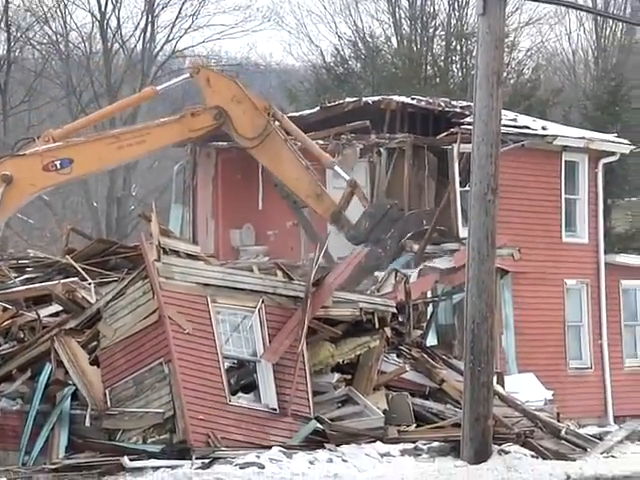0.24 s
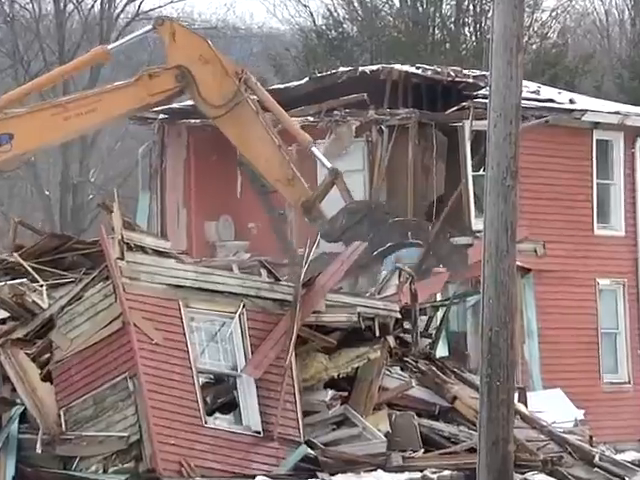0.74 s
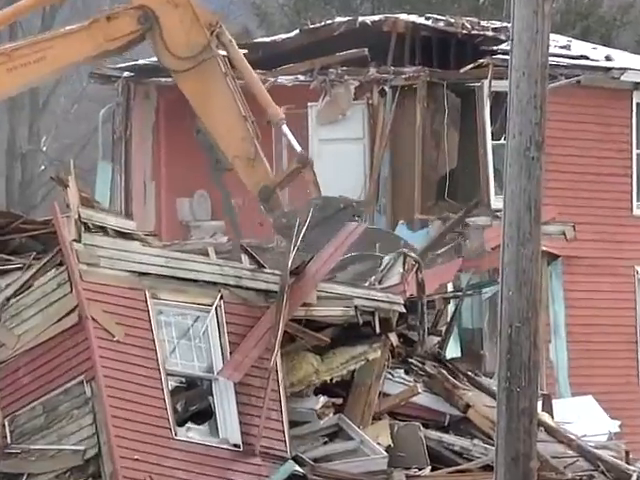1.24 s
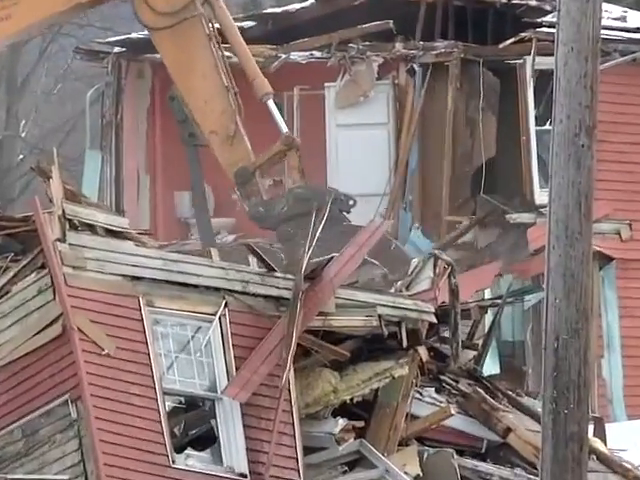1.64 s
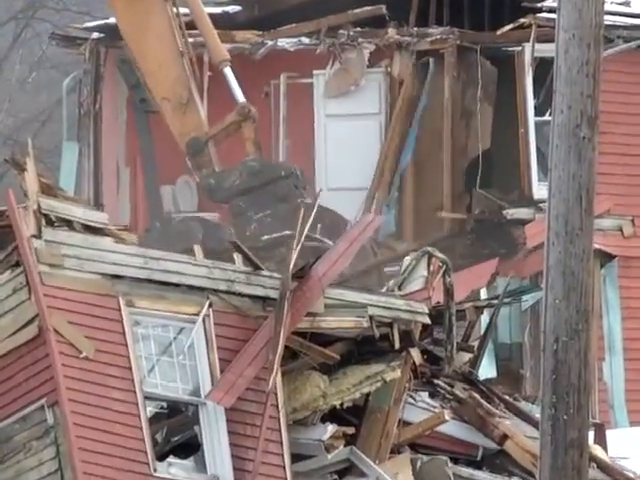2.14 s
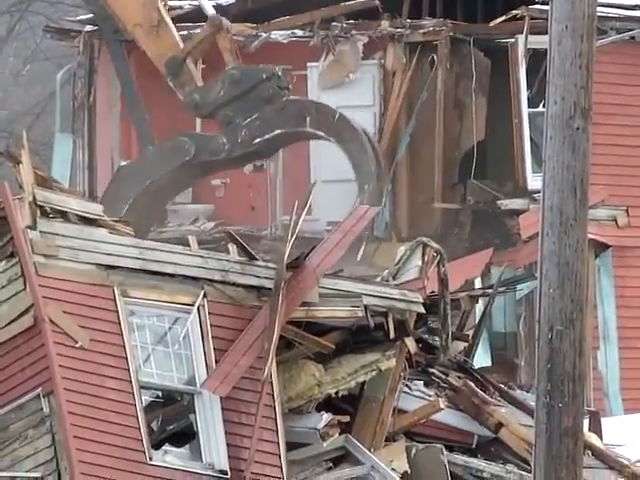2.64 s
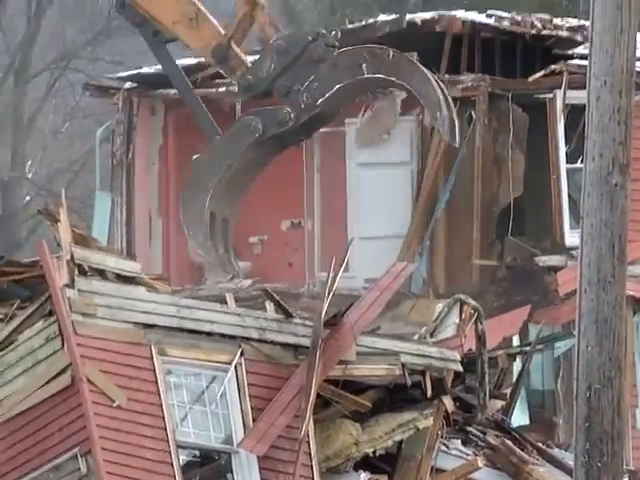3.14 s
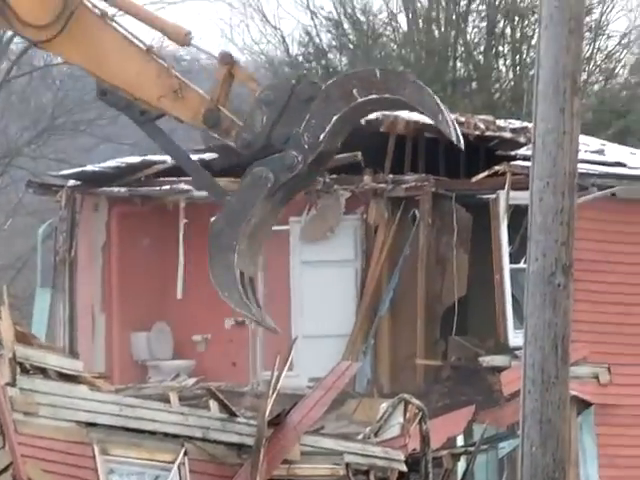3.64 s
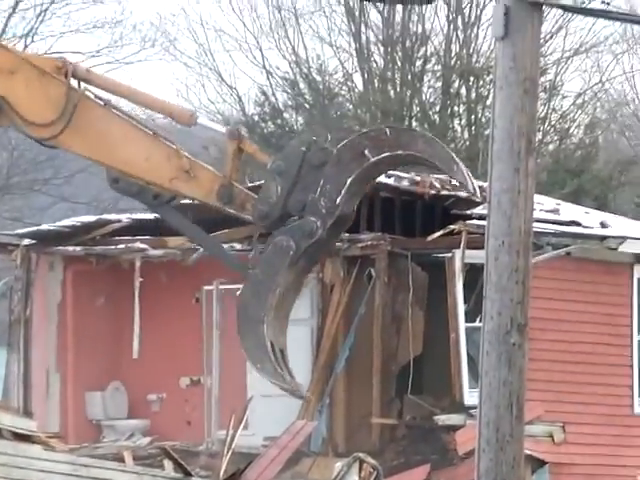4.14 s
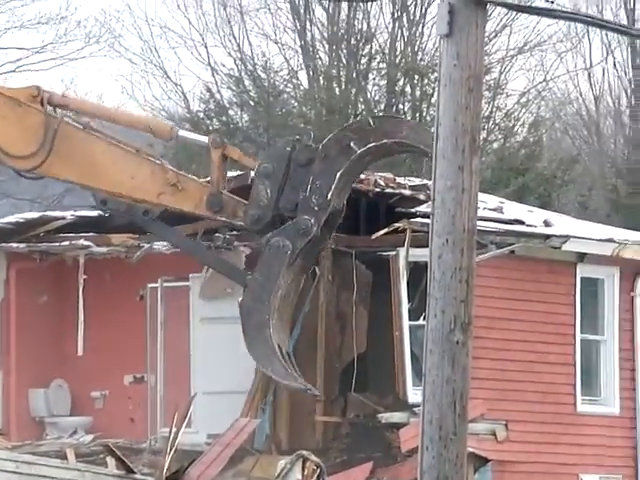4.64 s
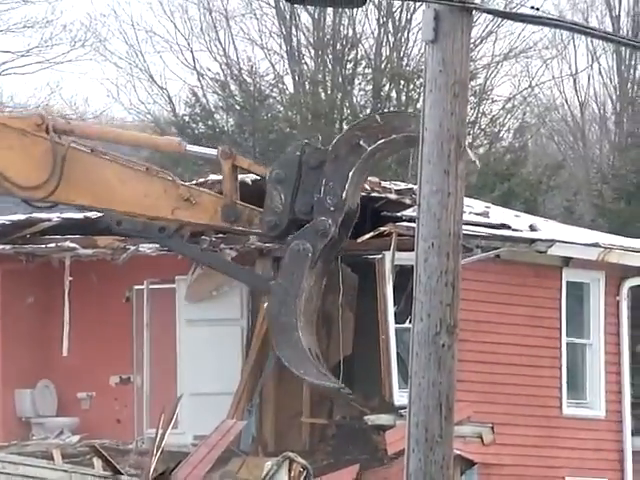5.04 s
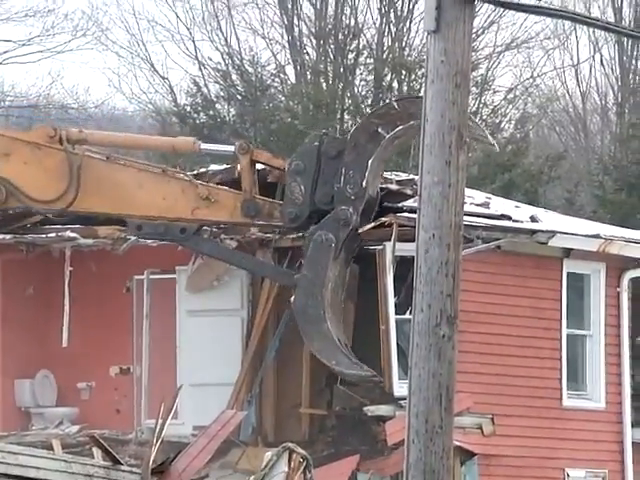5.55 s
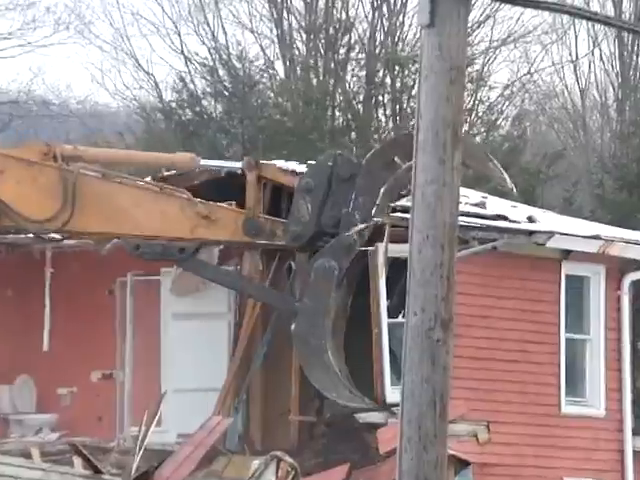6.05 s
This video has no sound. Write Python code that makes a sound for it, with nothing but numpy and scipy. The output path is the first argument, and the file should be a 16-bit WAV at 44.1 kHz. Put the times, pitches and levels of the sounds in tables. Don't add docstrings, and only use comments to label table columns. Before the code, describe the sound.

Loud engine roar beside a wooden house being torn down: early splintering crack and clattering boards, a sharp snap, then pump whine and howling oil pressure.

```python
import sys
import numpy as np
from scipy import signal
from scipy.fft import rfft, irfft, next_fast_len
from scipy.io import wavfile
from scipy.ndimage import uniform_filter1d

SR = 44100
rng = np.random.default_rng(int(sys.argv[2]) if len(sys.argv) > 2 else 0)


def wrap_up_sound(samples):
    columns = np.atleast_2d(samples).T
    tamed = np.clip(columns, -1, 1)
    steps = np.round(tamed * 32767).astype(np.int16)
    wavfile.write(sys.argv[1], SR, steps)


def decibels_to_gain(level_db):
    exponent = np.asarray(level_db, float) / 20
    return 10 ** exponent


N = 278112
STEP = 64
SIZE = next_fast_len(N + 8192)
HZ = np.maximum(np.arange(SIZE // 2 + 1) * SR / SIZE, 1)
TIME = np.arange(N) / SR
COARSE = np.arange(N // STEP + 2) * STEP / SR
FIRING_HZ = 100.4
LIFT_S = 1.95


def in_time(rows, t):
    s, *columns = np.transpose(rows)
    return [np.interp(t, s, c) for c in columns]


def at_hz(points, hz, count=1):
    return np.interp(np.log(hz), np.log(np.array(points)[:, 0]), np.array(points)[:, count])


def drift(rate_hz):
    r = np.exp(-2 * np.pi * rate_hz * STEP / SR)
    slow = signal.lfilter([1], [1, -2 * r, r * r], rng.standard_normal(len(COARSE) + 1000))[1000:]
    return slow / np.std(slow)


def fine(coarse):
    return np.interp(TIME, COARSE, coarse)


def oscillator_phase(hz):
    return 2 * np.pi * np.cumsum(hz) / SR


def since(s, t60):
    start = int(s * SR) + 1
    t = TIME[start:start + int(t60 * SR)] - s
    return slice(start, start + len(t)), t


def ring(s, hz, t60):
    out = np.zeros(N)
    span, t = since(s, t60)
    out[span] = np.sin(2 * np.pi * hz * t) * decibels_to_gain(-60 * t / t60) * (1 - np.exp(-1.5 * hz * t))
    return out


def before_lift():
    return np.clip((LIFT_S - TIME) * 10, 0, 1)


def during(spans, values=1):
    fade_s = 0.065
    inside = [np.clip(np.minimum(TIME - start, end - TIME) / fade_s, 0, 1) for start, end, *_ in spans]
    return (np.c_[values] * inside).sum(axis=0)


# (frequency [Hz], share [0-1], phase lead [rad])
PORT_COUPLING = [(25, .5, -0.5), (500, 0.03, 2), (1000, 0.53, 1.5), (1800, 0.28, -1), (2500, 0.7, -2.5),
                 (3200, 0.7, -5), (4070, 0.57, -6), (5330, 0.7, -7), (7050, 0.2, -20.5),
                 (15700, 0.5, -42.5)]


def port_noise():
    ahead, own = rfft(rng.standard_normal((2, SIZE))) * np.sqrt(SR / 2)
    share = np.clip(at_hz(PORT_COUPLING, HZ), 0, .95)
    copied = share * ahead * np.exp(1j * at_hz(PORT_COUPLING, HZ, count=2))
    return ahead, copied + np.sqrt(1 - share ** 2) * own


# (frequency [Hz], density [dB per Hz])
AHEAD_SPECTRUM = [(25, -57), (42, -57), (62, -53.5), (130, -54.5), (280, -57), (520, -55), (950, -53),
                  (1550, -53.5), (2200, -62.5), (3300, -73.5), (5300, -89.5), (6700, -99), (10500, -94),
                  (15500, -99)]
# (frequency [Hz], density [dB per Hz])
ACROSS_SPECTRUM = [(25, -86), (250, -72), (600, -63.5), (900, -53.5), (1500, -48), (2200, -55), (3200, -65),
                   (4200, -73.5), (5400, -80.5), (7300, -94), (9300, -90.5), (10600, -86), (12000, -91),
                   (15500, -97)]
# (time [s], engine effort [dB], rubble and iron on the move [dB],
# engine side turned across the ports [dB], bearing to the left [dB])
WORK_CYCLE = [(0, 0.5, 1.5, 2.5, -4), (.2, -3.5, 2.5, -0.5, -0.5), (.45, -1, 8, -3.5, 2.5),
              (.7, -1.5, 3.5, -1.5, 0), (1.05, -1.5, 6, 0, -1.8), (1.3, -1.5, 1, 3.5, -0.5),
              (1.75, -3, -3.5, -3, 1.5), (2.2, -1.5, -2, -0.8, 1.3), (2.7, 0.5, -3.5, -2, 2.5),
              (3.2, 0.5, -2, -3.5, 1.5), (3.65, 2.4, -0.6, -3, 0), (4.05, 4, -1, 0.3, -1.5),
              (4.45, -0.8, 4, 3.5, -1.5), (4.75, -1, 2, 3, -0.2), (5.02, 0.5, -2.3, -2, 1.7),
              (5.4, 2, 0.8, 6, -1), (5.7, 2.4, 0.6, 5.5, -2), (6.31, 4, 0.1, -2, -2.9)]
# (dB per dB of effort, of rubble, of turn, of bearing)
RUMBLE, DRONE, ROAR, RASP = (0.26, 0.37, 0.4, 0.5), (0.28, 0.81, -0.21, -0.35), (1, 0, 0, 0), (1, 0.61, -0.19, -0.5)
CLATTER, HISS, AIR = (0, 1, 0, 0), (-.3, -0.06, 0.4, -0.64), (0.12, .35, 0.046, -.35)
ROAR_ACROSS, RASP_ACROSS = (0, 0, 1, 0), (-0.3, 0.49, -0.22, -.55)
CLATTER_ACROSS = (0.24, 0.39, -0.59, -2.1)


def machine(shared_db, own_db, knock):
    hiss_flicker_db = 1.3
    work = np.array(in_time(WORK_CYCLE, COARSE))
    bearing_db = work[-1]
    parts_hz = np.log([90, 400, 1400, 2250, 3800, 7000, 15000])
    parts = np.array([[RUMBLE, DRONE, ROAR, RASP, CLATTER, HISS, AIR],
                      [RUMBLE, DRONE, ROAR_ACROSS, RASP_ACROSS, CLATTER_ACROSS, HISS, AIR]]) @ work
    parts = parts - parts.mean(axis=2, keepdims=True)
    white = port_noise()
    colours = decibels_to_gain(at_hz(AHEAD_SPECTRUM, HZ)), decibels_to_gain(at_hz(ACROSS_SPECTRUM, HZ))
    firing = np.cos(oscillator_phase(FIRING_HZ + fine(3.33 * drift(5.6))))
    out, together, octave = np.zeros((2, N)), drift(16.3), np.log2(HZ)
    for centre in np.arange(13, 43) / 3:
        mask = np.clip(1 - 3 * abs(octave - centre), 0, 1)
        place = np.interp(centre * np.log(2), parts_hz, np.arange(7))
        low = min(int(place), 5)
        swing_db = parts[:, low] * (low + 1 - place) + parts[:, low + 1] * (place - low)
        shared_flicker_db = shared_db * together * (.5 < place < 4.3)
        own_flicker_db = drift(28) * (own_db if place < 4.3 else hiss_flicker_db)
        gains = decibels_to_gain(swing_db + shared_flicker_db + own_flicker_db)
        ahead, across = (irfft(white[k] * colours[k] * mask, SIZE)[:N] for k in range(2))
        if 900 < 2 ** centre < 2100:
            share = fine(np.clip(0.13 * bearing_db, -.9, .9))
            leaked = irfft(white[0] * colours[1] * mask, SIZE)[:N]
            across = share * leaked + np.sqrt(1 - share ** 2) * across
        pulse = 1 + knock * firing * (place > 1)
        for k, band in enumerate((ahead, across)):
            out[k] += band * pulse * fine(gains[k])
    return out


# (start [s], end [s], strength [dB], sag [Hz], negative rises)
RAM_STROKES = [(1.95, 2.35, -2, 0), (2.404, 2.92, 1, -3), (2.97, 3.352, 1.5, 12.5), (3.402, 3.65, 0, -8),
               (3.901, 4.2, 0.5, 11), (4.199, 4.498, 3.5, -10.5), (4.75, 5.8, -2, 0),
               (5.802, 6.399, -0.5, 11)]
# (start [s], end [s])
LOAD_HOLDS = [
    (1.05, 1.56),
    (4.2, 5.55),
]


def pump_whine(pitch_wobble, half_wobble):
    strength_db, sag_hz = np.transpose(RAM_STROKES)[-2:]
    whine_db = -34 - 9 * (1 - during(RAM_STROKES)) + during(RAM_STROKES, strength_db) - 6 * before_lift()
    half_db = -40.5 - 9.5 * (1 - during(LOAD_HOLDS))
    turn = oscillator_phase(598 - during(RAM_STROKES, sag_hz) + 3.0 * pitch_wobble)
    whine = decibels_to_gain(whine_db + 1.5 * fine(drift(6.3))) * np.sin(turn)
    half = decibels_to_gain(half_db + 1.5 * half_wobble) * np.sin(turn / 2)
    return whine + half


def firing_hum(pitch_wobble, level_wobble):
    return decibels_to_gain(-42 + 0.83 * level_wobble) * np.sin(oscillator_phase(FIRING_HZ + 1.4 * pitch_wobble))


def throb(pitch_wobble, level_wobble):
    return decibels_to_gain(-43 + 3.0 * level_wobble) * np.sin(oscillator_phase(26.6 + 0.73 * pitch_wobble))


def tones():
    engine, half, load, shake = [fine(drift(4.72)) for k in range(4)]
    total = pump_whine(engine, half) + firing_hum(engine, load) + throb(load, shake)
    return np.sqrt(2) * total * decibels_to_gain([[0], [-17]])


# (time [s], centre [Hz], level [dB])
VALVE_HOWL = [(1.9, 950, -36), (2.6, 940, -29.5), (3.3, 940, -25), (4.0, 915, -26), (4.6, 930, -25.5),
              (5.0, 950, -29), (5.5, 1010, -22.5), (5.95, 990, -36), (6.31, 1000, -25)]


def howl(width_hz):
    hz, db = in_time(VALVE_HOWL, TIME)
    db = db + fine(drift(9.0)) - 12 * before_lift()
    turn = oscillator_phase(hz + 25 * fine(drift(8.0)))
    cos_part, sin_part = fine(drift(width_hz)), fine(drift(width_hz))
    return decibels_to_gain(db) * (cos_part * np.cos(turn) + sin_part * np.sin(turn)) * decibels_to_gain([[0], [-7]])


# (time [s], peak [dB], ring [Hz], t60 [s], difference
# re head-on [dB])
WOOD_BLOWS = [
    (.3152, -3, 1450, .016, -12),
    (.321, -13, 1500, .05, -12),
    (.3265, -10, 1900, .025, -4),
    (.3303, -3, 700, .018, -14),
    (.339, -5, 560, .06, -14),
    (.3575, -10, 1200, .05, -10),
    (.3662, -6, 680, .018, -10),
    (.862, -18, 70, .2, -25),
    (.908, -13, 95, .3, -25),
              (0.579, -19, 1600, 0.049, 6), (0.341, -17.5, 175.5, 0.18, -37), (.405, -14, 495, 0.14, -20),
               (0.4272, -13, 1080, 0.044, -10), (.525, -17, 695, 0.042, 2), (.584, -21, 484, 0.19, -15),
               (.62, -18.5, 172, 0.15, -27), (0.636, -14.5, 417, 0.081, -15), (0.657, -9.5, 1654, .03, -8),
               (0.729, -18, 1000, .05, -8), (.835, -14, 453, 0.064, -23), (0.991, -16, 123, 0.089, -26),
               (1.095, -22, 98.3, 0.13, -27), (1.138, -15.5, 1473, 0.12, -10), (4.43, -14, 620, .08, -12),
               (4.601, -18, 184, 0.17, -16), (5.359, -6, 1000, 0.024, -11)]


def knocks():
    blows = WOOD_BLOWS
    out, detune = np.zeros((2, N)), rng.uniform(1.08, 1.4, len(blows))
    for (s, db, hz, t60, across_db), ratio in zip(blows, detune):
        main = ring(s, hz, t60)
        neighbour = ring(s + 0.00166, hz * ratio, 1.9 * t60)
        out[0] += decibels_to_gain(db) * (main + 0.21 * neighbour)
        out[1] += decibels_to_gain(db + across_db) * (neighbour * 0.57 - ring(s + 0.00047, hz, t60))
    return out


# (frequency [Hz], head-on level [dB], difference level [dB])
LATH_MODES = [
    (2300, -17, -9),
    (2620, -19, -12),
]


def snap():
    start_s, length_s = 1.6332, .0056
    tear_hz, tear_db = [6500, 15700], [[-37], [-28]]
    phase = np.clip((TIME - start_s) / length_s, 0, 1)
    swell = np.sin(np.pi * phase ** 1.3) ** 2
    t = TIME - start_s - .6 * length_s
    lath = sum(np.cos(2 * np.pi * hz * t) * decibels_to_gain([[ahead_db], [across_db]]) * [[-1], [1]]
               for hz, ahead_db, across_db in LATH_MODES)
    bright = signal.butter(3, tear_hz, "band", fs=SR, output="sos")
    tear = signal.sosfilt(bright, rng.standard_normal((2, N)))
    return swell * (lath + decibels_to_gain(tear_db) * tear)


# (time [s], t60 [s], board band [dB], clatter band [dB], top band [dB])
SPLINTER_BURSTS = [(.315, .06, -18, -28, -44), (.3255, .1, -13, -23, -38), (.327, .025, -30, -24, -27),
                   (.342, .3, -19, -35, -56), (1.6342, .015, -36, -19, -21), (.366, .03, -30, -36, -52),
                   (.42, .15, -24, -36, -52), (.49, .1, -26, -36, -49), (.68, .06, -28, -36, -48),
                   (.815, .08, -28, -36, -47), (.92, .1, -28, -33, -46), (1.04, .08, -28, -36, -48),
                   (1.545, .08, -36, -48, -50), (.53, .06, -22, -36, -52), (.58, .07, -22, -36, -50),
                   (.655, .06, -22, -35, -52), (.73, .05, -24, -38, -52), (1.135, .08, -22, -36, -52),
                   (1.99, .06, -36, -42, -52), (2.665, .1, -36, -44, -47)]
# (low edge [Hz], high edge [Hz], head-on level [dB], difference level [dB])
SPLINTER_BANDS = [
    (300, 2100, 10, 0),
    (3000, 4800, 3, 9),
    (8600, 11800, 2, 9),
]


def splinters():
    grains = rng.standard_normal((2, N)) * decibels_to_gain(1.5 * rng.exponential(1, N))
    grains = grains / np.std(grains)
    envelopes = np.zeros((3, N))
    for s, t60, *band_db in SPLINTER_BURSTS:
        span, t = since(s, t60)
        envelopes[:, span] += decibels_to_gain(np.c_[band_db] - 60 * t / t60) * (1 - np.exp(-t / 0.00057))
    out = np.zeros((2, N))
    for envelope, (low_hz, high_hz, *port_db) in zip(envelopes, SPLINTER_BANDS):
        band = signal.butter(3, [low_hz, high_hz], "band", fs=SR, output="sos")
        out += signal.sosfilt(band, grains * envelope + 1e-18) * decibels_to_gain(np.c_[port_db])
    return out


# (time [s], peak [dB], ring [Hz], t60 [s])
GLASS_TINKLES = [
    (.816, -54, 14800, .05),
    (.817, -54, 13500, .06),
    (.83, -50, 13550, .05),
    (.866, -44, 10100, .035),
]


def glass():
    return sum(decibels_to_gain(db) * ring(s, hz, t60) for s, db, hz, t60 in GLASS_TINKLES) * decibels_to_gain([[-8], [0]])


def scene():
    ahead, across = (machine(shared_db=0.77, own_db=0.45, knock=0.12) + tones() + howl(width_hz=107)
                     + knocks() + snap() + splinters() + glass())
    return np.array([ahead + across, ahead - across])


# (centre [Hz], width [Hz], depth [dB])
CAMERA_NOTCHES = [
    (2850, 520, -24),
    (4990, 380, -17),
]


def notches(x):
    response = np.ones(len(HZ), complex)
    for hz, width_hz, depth_db in CAMERA_NOTCHES:
        off = 1j * (HZ - hz ** 2 / HZ) / width_hz
        response = response * (off + decibels_to_gain(depth_db)) / (off + 1)
    return irfft(rfft(x, SIZE) * response, SIZE)[:, :N]


def limiter(x, top_db, back_db_per_s):
    climb = back_db_per_s * TIME
    over = np.maximum(20 * np.log10(abs(x).max(axis=0) + 1e-9) - top_db, 0)
    cut = np.maximum(np.maximum.accumulate(over + climb) - climb, 0)
    return x * decibels_to_gain(-uniform_filter1d(cut, size=64, origin=-32))


def circuit_whistle():
    scan_hz, scan_db = 15734.3, [[-65], [-76]]
    return decibels_to_gain(scan_db) * np.sin(2 * np.pi * scan_hz * TIME) * [[1], [-1]]


def top_cut(x):
    return signal.sosfilt(signal.butter(12, 15790, fs=SR, output="sos"), x)


def record(dry):
    limited = limiter(notches(dry), top_db=-1.0, back_db_per_s=90)
    mix = limited + circuit_whistle()
    return top_cut(mix)


dry = scene()
out = record(dry)
wrap_up_sound(out)
```